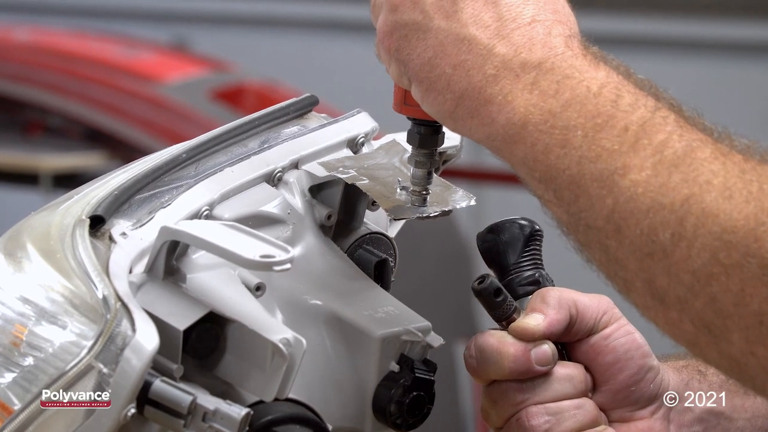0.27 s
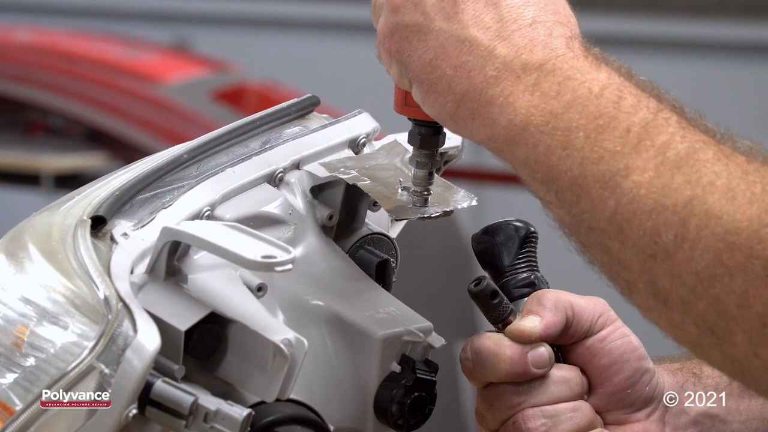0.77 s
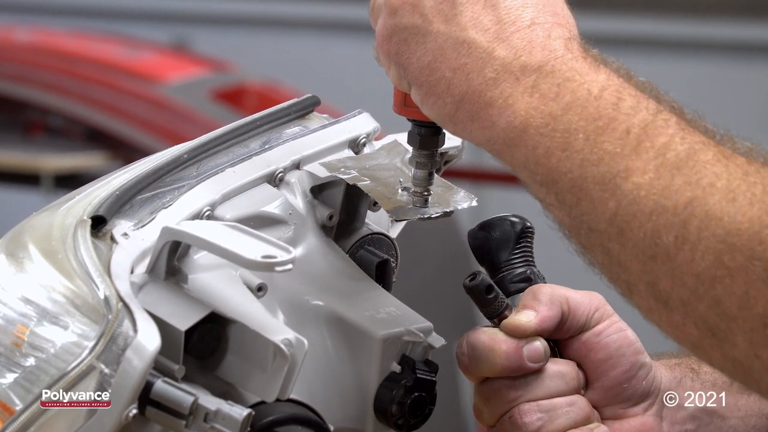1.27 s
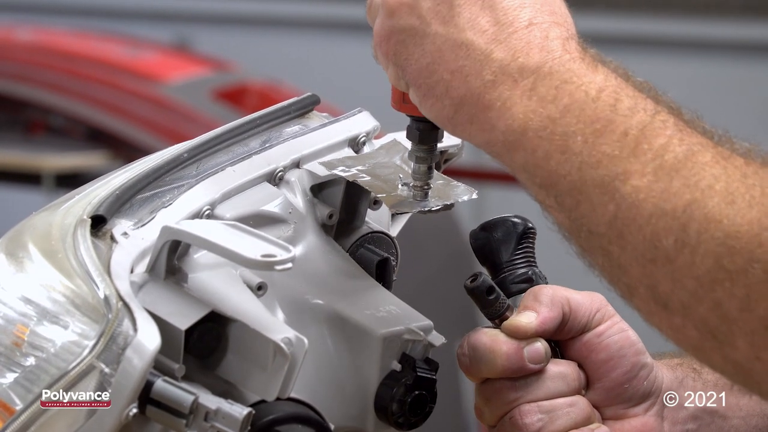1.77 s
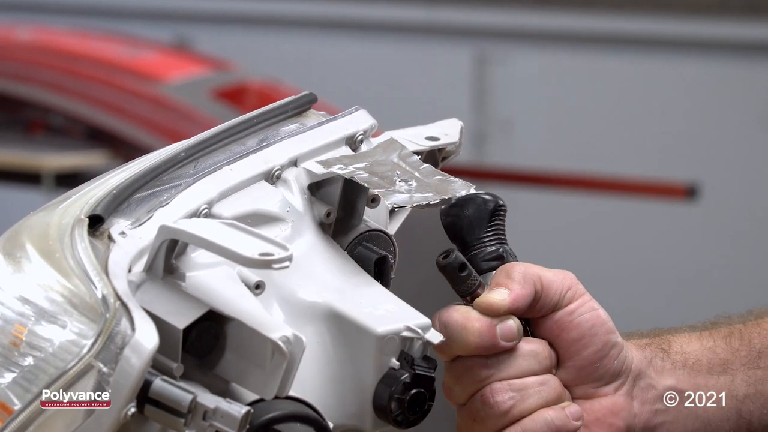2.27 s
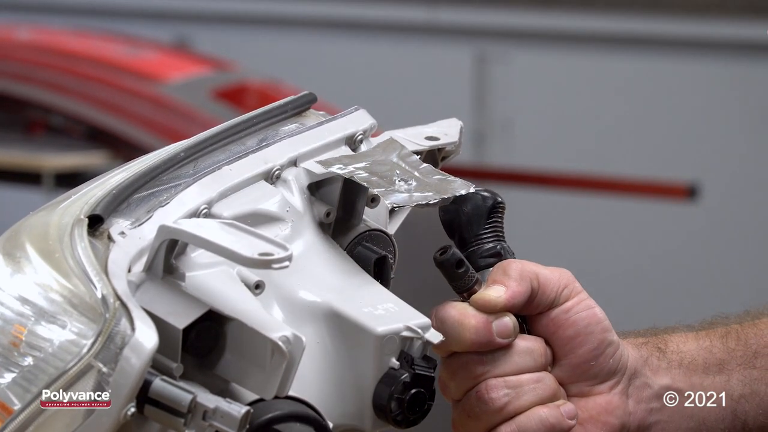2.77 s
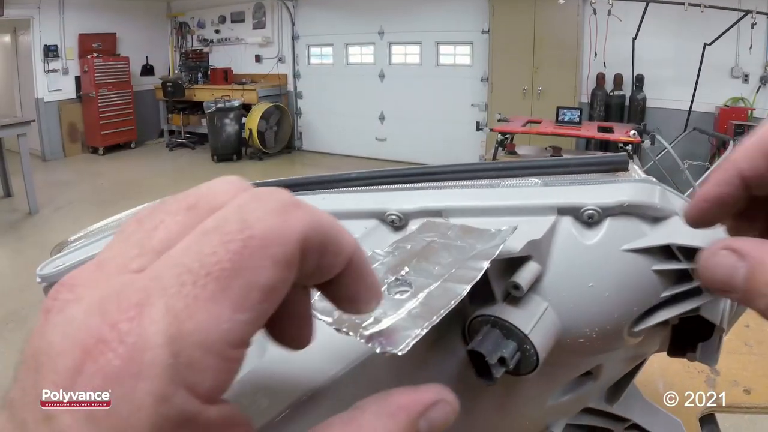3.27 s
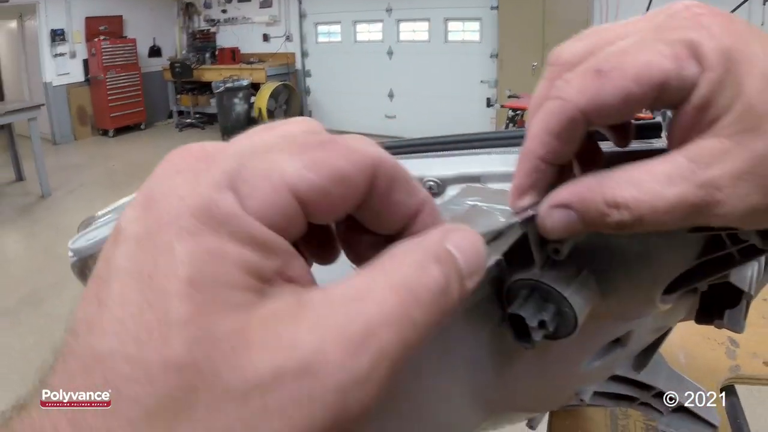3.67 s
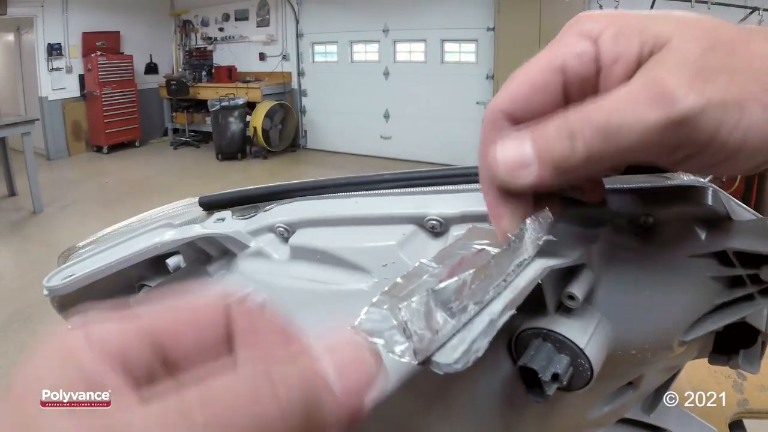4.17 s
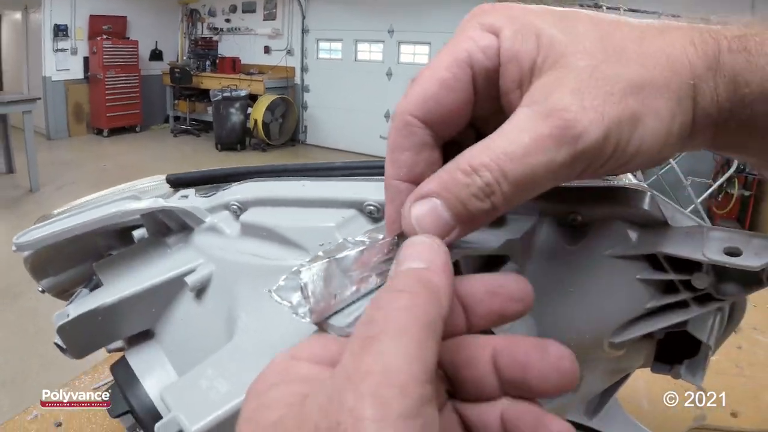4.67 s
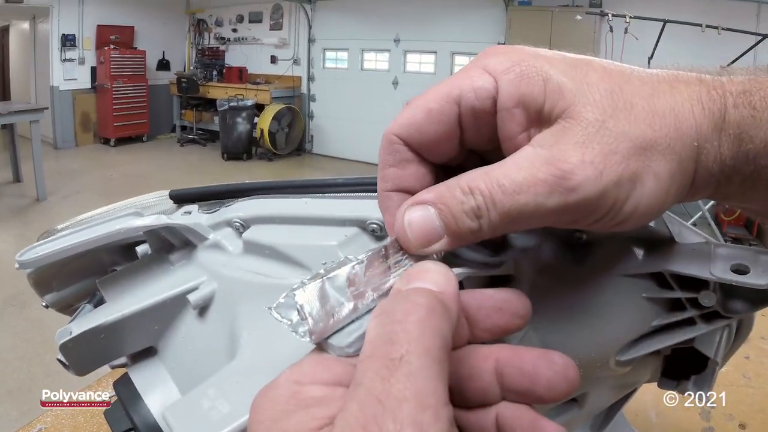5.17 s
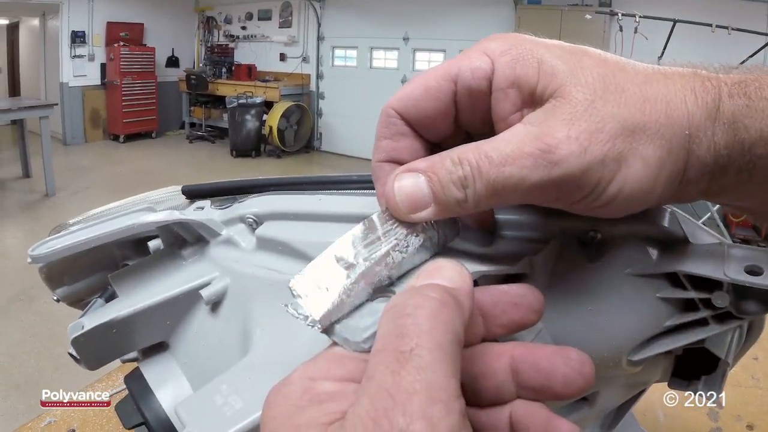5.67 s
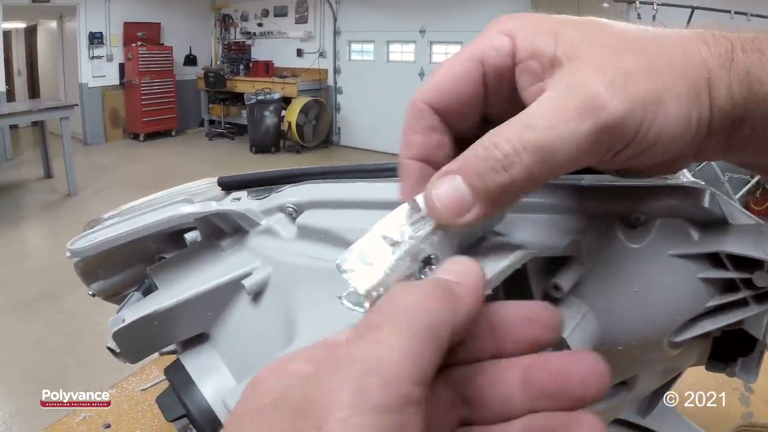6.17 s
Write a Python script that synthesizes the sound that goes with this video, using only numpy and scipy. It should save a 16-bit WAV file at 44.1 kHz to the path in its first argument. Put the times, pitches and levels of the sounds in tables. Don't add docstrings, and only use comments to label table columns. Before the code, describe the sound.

A blow gun hisses steadily and close on a hollow plastic housing, brightening in short rushes as the jet crosses edges, with faint quick ticks beneath. At about three seconds it fades into a much quieter reverberant workshop of fans and air. Fingers peel foil tape: a knock, a sharp loud snap, tiny crackles, then a squeaky rub and a closing hollow knock.

```python
import sys
import numpy as np
from scipy import signal
from scipy.io import wavfile
from scipy.ndimage import uniform_filter1d

SR = 44100
rng = np.random.default_rng(int(sys.argv[2]) if len(sys.argv) > 2 else 0)


def how_loud(loudness_db):
    steps = np.asarray(loudness_db, float) / 20
    return 10 ** steps


def master(y):
    cut = np.clip(np.atleast_2d(y).T, -1, 1)
    pcm = np.round(cut * 32767)
    wavfile.write(sys.argv[1], SR, pcm.astype(np.int16))


N = 284004


def evened(x):
    return x / np.sqrt(np.mean(x ** 2) + 1e-20)


def curves(rows, t):
    s, *columns = np.transpose(rows)
    return [np.interp(t, s, c) for c in columns]


def ramp(t, start, end):
    return np.clip((t - start) / (end - start), 0, 1)


def add(mix, s, sound):
    mix[round(s * SR):][:len(sound)] += sound


def read(points, hz):
    f, level_db = np.transpose(points)
    return np.interp(np.log(hz + 1), np.log(f + 1), level_db, left=-90, right=-90)


def noise(points, size=512, tilt_db=0, patchy_db=-0.5, flicker_db=3.5, peaks=()):
    hop = size // 4
    frames = N // hop + 5
    hz = np.fft.rfftfreq(size, 1 / SR)[:, None]
    real, imaginary, patches = rng.standard_normal((frames, len(hz), 3)).T
    patches = uniform_filter1d(patches, size=6, axis=0)
    patches = evened(uniform_filter1d(patches, size=16, axis=1))
    flicker = evened(uniform_filter1d(rng.standard_normal(frames), size=3))
    db = read(points, hz) + patchy_db * patches + flicker_db * flicker
    tilt_db = np.interp(np.arange(frames) * hop, np.arange(N), tilt_db * np.ones(N))
    db = db + tilt_db * np.clip(np.log2(hz / 6000 + 1e-9), -.4, .7)
    db = db + sum(lift_db / (1 + ((hz - f) / (w / 2)) ** 2) for f, w, lift_db in peaks)
    spectra = (real + 1j * imaginary) * how_loud(db)
    return evened(signal.istft(spectra, nperseg=size, noverlap=size - hop)[1][:N])


def walls(x, t60, wet_db):
    lag = np.arange(6000) / SR
    echoes = rng.standard_normal(6000) * how_loud(-60 * lag / t60) * (lag > .003)
    wet = how_loud(wet_db) * signal.oaconvolve(x, echoes / np.linalg.norm(echoes))[:N]
    return (x[:N] + wet) / np.sqrt(1 + how_loud(2 * wet_db))


def resonate(x, hz, width):
    return signal.lfilter(*signal.iirpeak(hz, hz / width, SR), x)


def ring(modes, factor, contact, flip_every):
    t = np.arange(2500) / SR
    x = np.zeros(2500)
    for k, (hz, db, t60) in enumerate(modes):
        sign = (-1) ** (k // flip_every)
        x += sign * how_loud(db - 60 * t / t60) * np.sin(2 * np.pi * hz * factor * t)
    x = np.convolve(x, np.hanning(contact))[:2500]
    x = signal.lfilter(*signal.butter(4, 0.83 * modes[0][0], "high", fs=SR), x)
    return x / abs(x).max()


def workshop(t):
    # freq_hz, density_db (per Hz)
    wash = [(180, -32), (300, -7), (436, -4.5), (633, -7), (907, 1), (1190, -0.5), (1390, -6), (1480, -1),
            (1840, -1), (2180, -4), (2350, 1), (2640, -6.5), (3370, -3), (4420, -10.5), (6500, -25),
            (8450, -41), (14300, -120)]
    hiss = [(2650, -8), (4500, -6), (4970, -2), (6150, -3.5), (7320, -4.5), (10000, -9.5), (15100, -12),
            (15900, -11)]
    rumble = [(8.8, -33), (15, 0), (40, -2.5), (59, -9), (86, 0), (130, -8.5), (190, -1.5), (273, -2),
              (304, -11), (334, 0.5), (372, -24), (434, -1.5), (600, -20), (780, -24), (1320, -120)]
    # freq_hz, width_hz, lift_db
    wash_peaks = [(980, 200, -2.5), (1885, 60, 0), (2420, 430, 2.5), (3210, 190, 2.5)]
    # time_s, wash_db
    swell = [(3.3, -50), (3.81, -47.5), (4.37, -46), (4.63, -49), (4.83, -50.5), (5.19, -47), (5.6, -50.5),
             (6.17, -46.5), (6.44, -47.5)]
    wash_db = curves(swell, t)[0]
    change_db = wash_db + 49
    hiss_db = -55.5 + 0.45 * change_db
    rumble_db = -59 + 0.4 * change_db
    mid = how_loud(wash_db + 4.5) * noise(wash, size=1024, patchy_db=0.3, flicker_db=0.0, peaks=wash_peaks)
    mid += how_loud(hiss_db) * noise(hiss, patchy_db=-1.2, flicker_db=-0.1)
    mid += how_loud(rumble_db + 2.5) * noise(rumble, size=2048, patchy_db=-0.5, flicker_db=0.2)
    mid = walls(mid, 0.28, -7)
    low_side = [(15, -11), (60, -5), (150, -21), (400, -21), (900, -29)]  # freq_hz, density_db
    high_side = [(5000, -18), (12000, 3), (15900, 1.0)]
    side = how_loud(rumble_db - 19) * noise(low_side, size=4096)
    side += how_loud(hiss_db - 23.5) * noise(high_side, size=2048, patchy_db=0.0)
    return ramp(t, 2.94, 3.19) * (mid + np.array([side, -side]))


def splices(t):
    short_steps = [2, 6, 10, 14, 32, 36, 40, 44, 54, 58, 68]
    long_steps = [19, 23, 27, 49, 63]
    block_s, first_s = 512 / 48000, .0248
    tick_db, spread_db = -26, .8
    steps = np.full(78, 4)
    steps[short_steps] = 3
    steps[long_steps] = 5
    at = np.round((first_s + block_s * (np.cumsum(steps) - steps)) * SR).astype(int)
    luck = rng.standard_normal((len(at), 2))
    train = np.zeros(N)
    train[at] = np.sign(luck[:, 0]) * how_loud(tick_db + spread_db * luck[:, 1])
    train = signal.lfilter(*signal.butter(2, 40, "high", fs=SR), train)
    spike, rebound = np.hanning(18), np.hanning(175)
    shape = np.concatenate([spike / spike.sum(), np.zeros(20), -2.0 * rebound / rebound.sum()])
    return signal.oaconvolve(train, shape)[9:N + 9] * np.clip((3.22 - t) / 0.46, 0, 1)


def rub(t):
    # freq_hz, width_hz, level_db
    tones = [(838, 94, -0.5), (950, 100, -1.5), (1330, 31, -3), (1936, 44, -0.5), (2003, 80, -1)]
    # start_s, hold_s, level_db
    strokes = [
        (4.503, 0.045, -50),
        (5.992, 0.085, -41.5),
        (6.106, 0.03, -45),
    ]
    rise_db_per_s, fall_db_per_s = 170, 300
    slips_per_s = 700
    strength = how_loud(4.7 * np.minimum(rng.exponential(1, N), 3))
    slips = np.sign(rng.standard_normal(N)) * strength * (rng.random(N) < slips_per_s / SR)
    x = sum(how_loud(db) * resonate(resonate(slips, hz, 1.35 * w), hz, 4 * w) for hz, w, db in tones)
    power = np.zeros(N)
    for s, hold, db in strokes:
        before, after = np.maximum(s - t, 0), np.maximum(t - s - hold, 0)
        power += how_loud(2 * (db - rise_db_per_s * before - fall_db_per_s * after))
    return np.sqrt(power) * evened(x)


def tape():
    # freq_hz, level_db, t60_s
    shell_modes = [(755, -20, 0.016), (1050, 1, 0.024), (1260, -3, 0.021), (1560, 1.5, .012),
                   (1930, 0, 0.01), (2520, 4.5, 0.011)]
    # freq_hz, level_db, t60_s
    foil_modes = [(2610, -3.5, 0.0088), (3820, 0, 0.0089), (4700, 3, 0.0025), (5920, -9, 0.024),
                  (6280, 9, 0.004), (7600, -1, 0.002), (8380, 6, 0.0042), (10000, -3, 0.0057),
                  (12500, -5, .0012)]
    # freq_hz, level_db, t60_s
    thump_modes = [(304, -18, .04), (509, 6, 0.04)]
    # start_s, shell_db, foil_db, shell_pitch_factor,
    # foil_pitch_factor
    pops = [
        (4.0645, -16.5, -32, 1.03, 1.02),
        (4.185, -28, -40, 1.2, 1.1),
        (4.329, -20.5, -11.5, 1.1, 0.96),
        (6.0495, -30, -50, 0.84, 1.01),
        (6.0698, -30, -50, 0.72, 1.01),
        (6.0918, -18, -28, 1.04, .9),
    ]
    # delay_s, shell_db, foil_db, shell_pitch_factor
    slips = [
        (0, -2.5, -2.5, 1.024),
        (.0005, -1.5, 0, 0.987),
        (.0014, -12, -12, .82),
    ]
    # start_s, level_db, pitch_factor
    crackles = [(3.6, -38, 1.4), (4.3242, -25, .99), (4.3272, -31, 0.92), (4.406, -35, .99),
                (5.07, -38, 1.5), (5.902, -36, 1.5), (6.28, -34.5, .95), (6.4235, -36, 0.96),
                (6.4245, -37, 1.2)]
    # start_s, level_db, pitch_factor
    rocks = [
        (2.522, -55, 0.93),
        (4.3307, -42, 1.4),
        (6.0922, -32.5, .99),
        (6.11, -41, 0.61),
    ]
    out = np.zeros(N + 2500)
    for s, shell_db, foil_db, shell_pitch, foil_pitch in pops:
        for k, (lag, knock_db, snap_db, bend) in enumerate(slips):
            knock = ring(shell_modes, shell_pitch * bend, contact=13, flip_every=6)
            snap = (-1) ** k * ring(foil_modes, foil_pitch, contact=5.5, flip_every=1)
            add(out, s + lag, how_loud(shell_db + knock_db) * knock + how_loud(foil_db + snap_db) * snap)
    for s, db, pitch in crackles:
        add(out, s, how_loud(db) * ring(foil_modes, pitch, contact=4.5, flip_every=1))
    for s, db, pitch in rocks:
        add(out, s, how_loud(db) * ring(thump_modes, pitch, contact=21, flip_every=1))
    return walls(out, 0.1, -24)


def blow_gun(t):
    # freq_hz, density_db (per Hz)
    surface = [(3000, -14), (3800, -14.5), (4400, -7.5), (4560, -1), (5500, -.5), (6400, 0.5), (7300, -2.5),
               (7950, -3), (8600, -8.5), (9400, -5.5), (10300, -12.5), (10900, -19.5), (12000, -32),
               (14000, -40)]
    nozzle = [(6180, -43), (10500, -7.5), (11600, -5), (14300, 3.5), (15100, 2), (15900, 0)]
    roar = [(250, -28.5), (400, -28), (690, -25.5), (880, -21), (1200, -19.5), (1950, -9), (2350, -3),
            (2700, -1.5), (3200, -2), (3550, -10), (3900, -4), (4300, -4.5), (5500, -8)]
    room_tone = [(8.8, -43), (15, -13), (91, 6), (350, -7), (460, -34), (770, -120)]
    # time_s, hiss_db, flow_db
    aim = [(0, -29.5, 0.5), (1.03, -31.5, 0.5), (1.4, -32, -0.5), (1.56, -29.5, -0.5), (1.8, -29, -2.5),
           (1.97, -33.5, -1.3), (2.21, -33.5, -1), (2.43, -29.5, -1.5), (2.95, -30, -1)]
    # start_s, rise_s, hold_s, lift_db
    edges = [
        (1.062, .012, 0.14, 6),
        (1.279, 0.01, 0.011, 5.5),
        (1.997, 0.053, .005, 7.5),
        (2.56, 0.17, .03, 2),
        (2.95, 0.061, 0.18, 4),
    ]
    edge_fall_s = 0.068
    aim_db, flow_db = curves(aim, t)
    surface_db = aim_db
    for s, rise, hold, db in edges:
        end = s + rise + hold
        surface_db = surface_db + db * (ramp(t, s, s + rise) - ramp(t, end, end + edge_fall_s))
    change_db = surface_db + 30
    nozzle_db = -38 + 0.4 * change_db + 1.5 * flow_db + 0.94 * t
    roar_db = -38 + 0.1 * change_db - 0.15 * flow_db - 2 * t
    bright_db = -5.5 + 1.06 * change_db + 0.2 * flow_db + 2 * t
    x = how_loud(surface_db) * noise(surface, tilt_db=np.clip(bright_db, -8, 8), patchy_db=0.14, flicker_db=0.4)
    x += how_loud(nozzle_db) * noise(nozzle, patchy_db=0.9, flicker_db=-1.0)
    x += how_loud(roar_db) * noise(roar, size=1024, patchy_db=0.5, flicker_db=0.45)
    x += how_loud(-76.5) * noise(room_tone, size=2048, patchy_db=-1.5)
    return walls(x, 0.24, -12.5) * (1 - ramp(t, 3.036, 3.247))


def scene():
    t = np.arange(N) / SR
    return workshop(t) + splices(t) + rub(t) + tape() + blow_gun(t)


def low_pass(x):
    return signal.sosfilt(signal.butter(12, 16400, fs=SR, output="sos"), x)


def record(dry):
    partings = [.11, 1.69, 1.74, 1.83, 1.92, 2.32, 2.41, 2.6, 3.76, 4.22, 4.47, 4.79, 4.88, 5.31, 5.68,
                5.92, 6.4]
    low_hz, edge_hz, half_width_octaves = 5140, 15830, .12
    hz, t, z = signal.stft(dry.mean(0), SR, nperseg=512)
    centres = low_hz * (edge_hz / low_hz) ** np.sqrt(rng.random((len(partings), 3)))
    cells = np.zeros(z.shape)
    for s, bands in zip(partings, centres):
        near = abs(np.log2((hz[:, None] + 1) / bands)) < half_width_octaves
        cells += (abs(t - s) < .014) * near.any(1)[:, None]
    phases = np.exp(2j * np.pi * rng.random(z.shape[::-1]).T)
    side = signal.istft(z * cells * phases, SR, nperseg=512)[1][:N]
    wide = dry + how_loud(-4.5) * np.array([side, -side])
    lowpass = signal.firwin(511, edge_hz, window=("kaiser", 7), fs=SR)
    return low_pass(signal.oaconvolve(wide, lowpass[None], "same"))


dry = scene()
out = record(dry)
master(out)
```